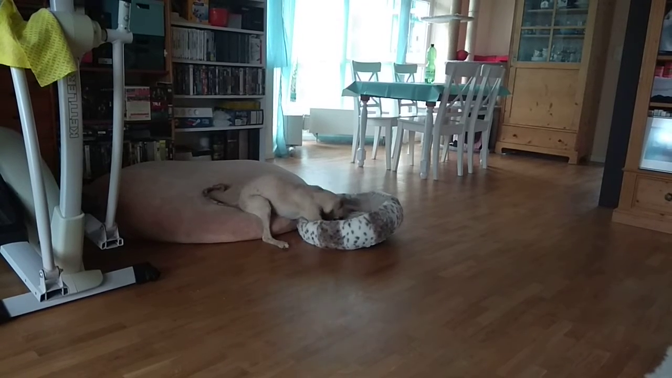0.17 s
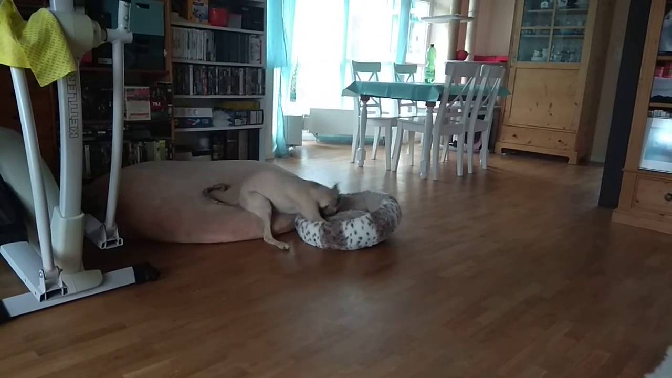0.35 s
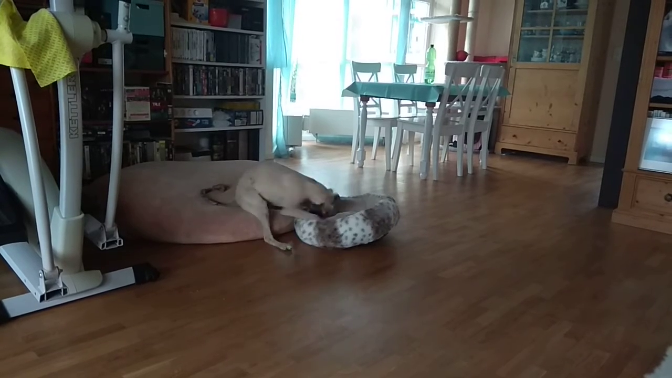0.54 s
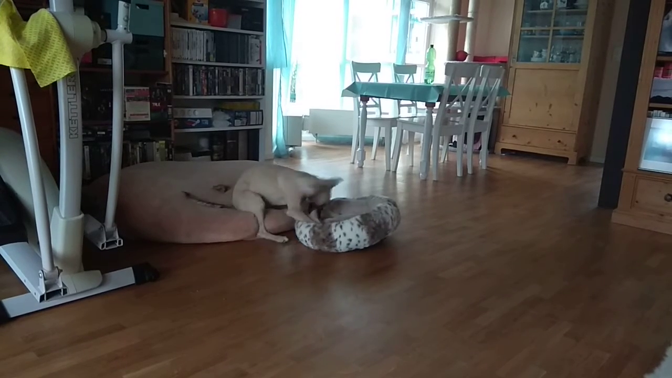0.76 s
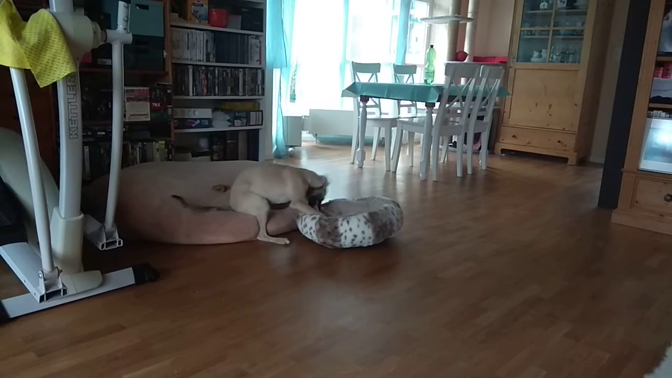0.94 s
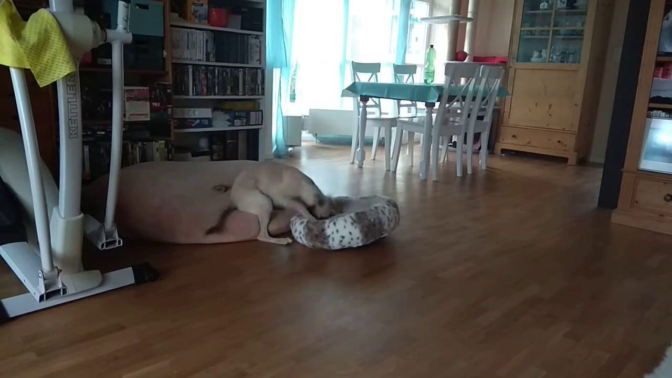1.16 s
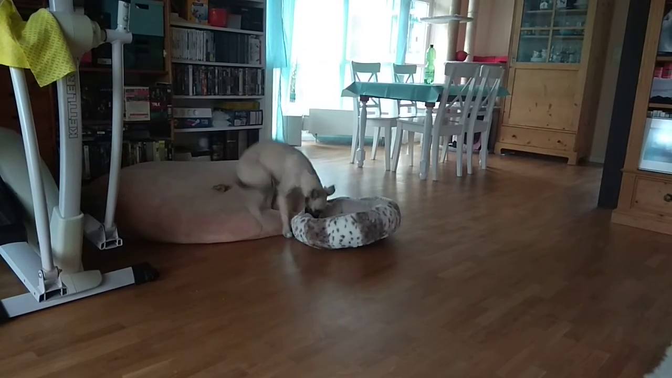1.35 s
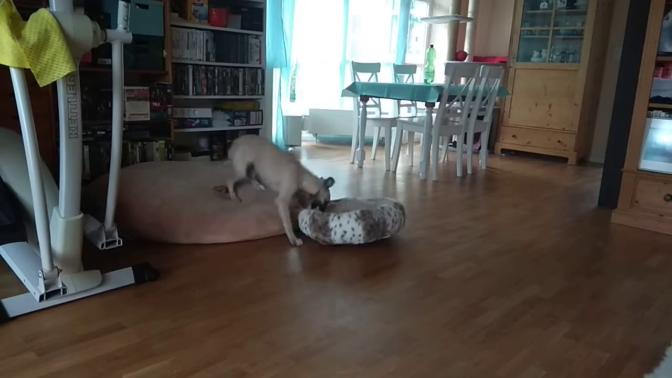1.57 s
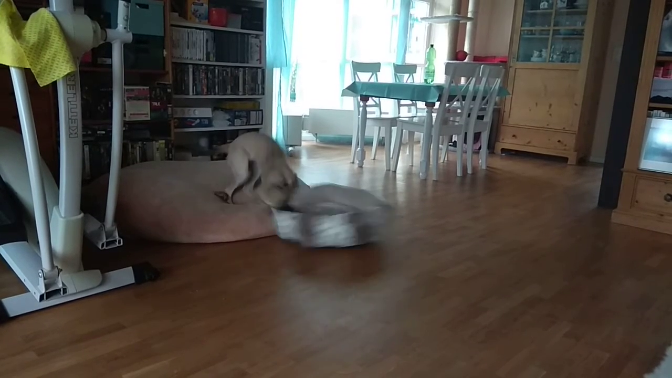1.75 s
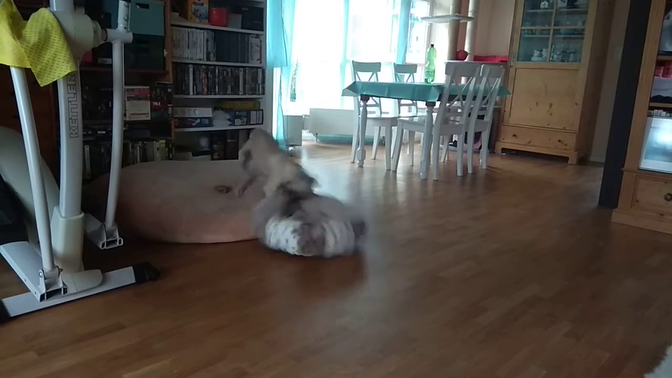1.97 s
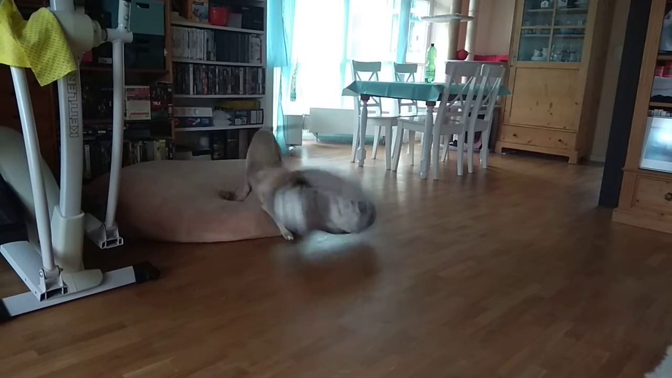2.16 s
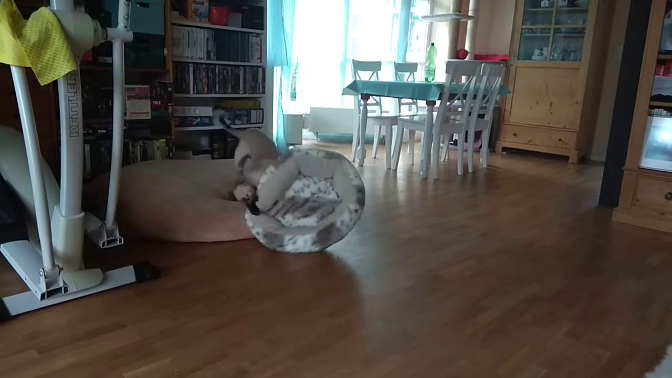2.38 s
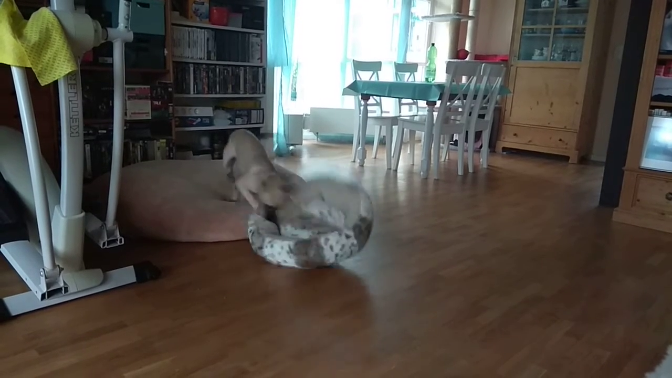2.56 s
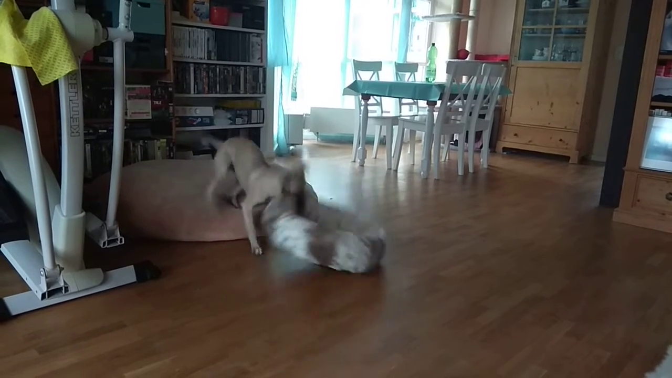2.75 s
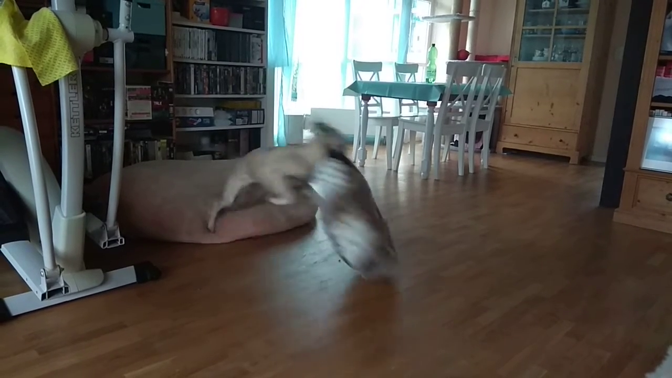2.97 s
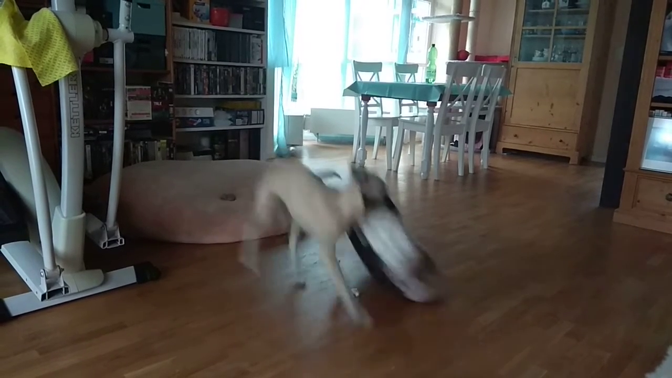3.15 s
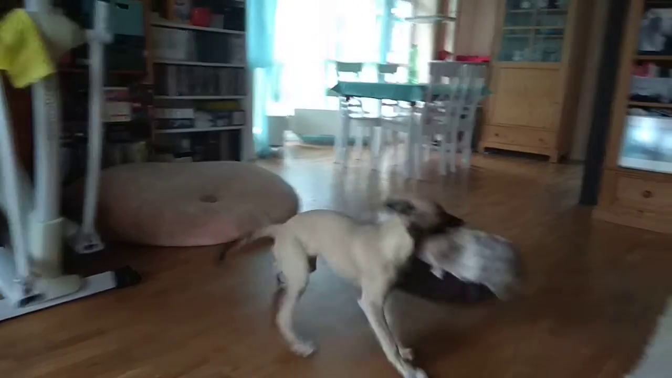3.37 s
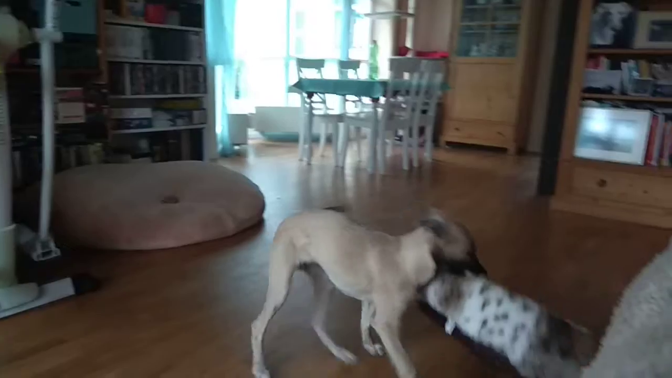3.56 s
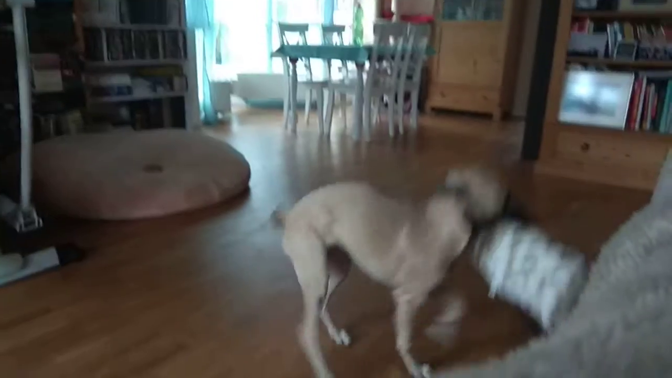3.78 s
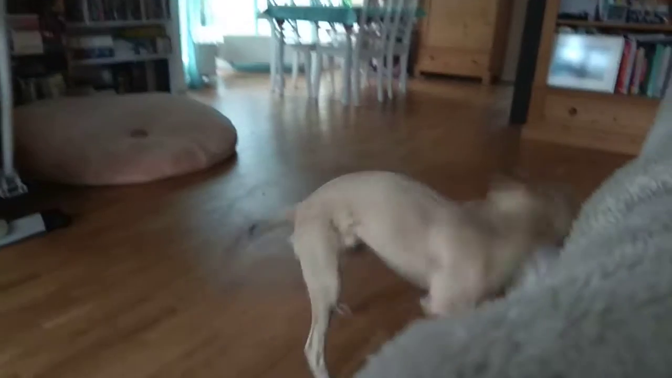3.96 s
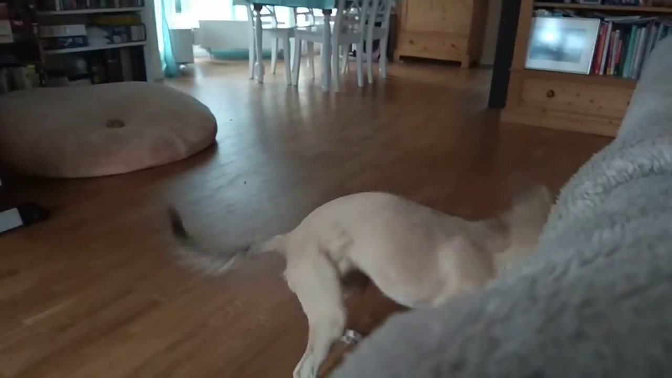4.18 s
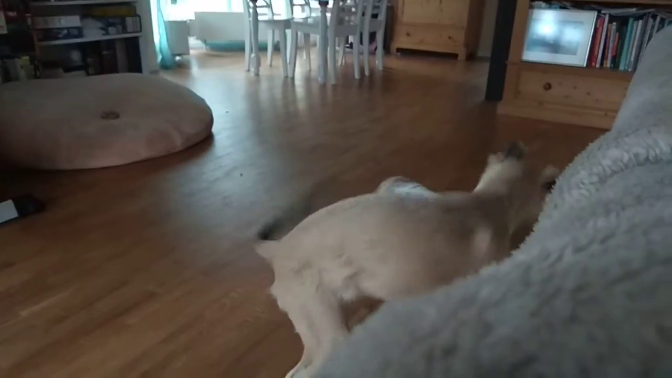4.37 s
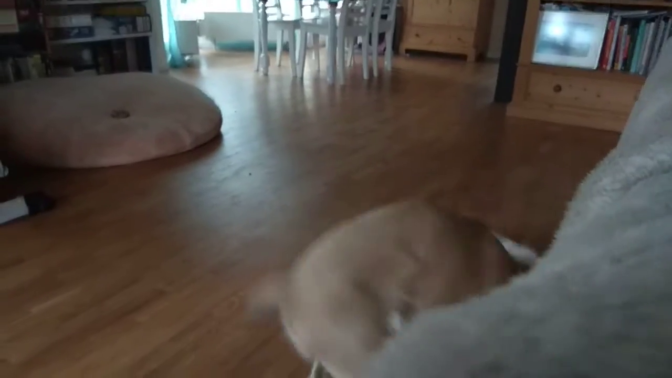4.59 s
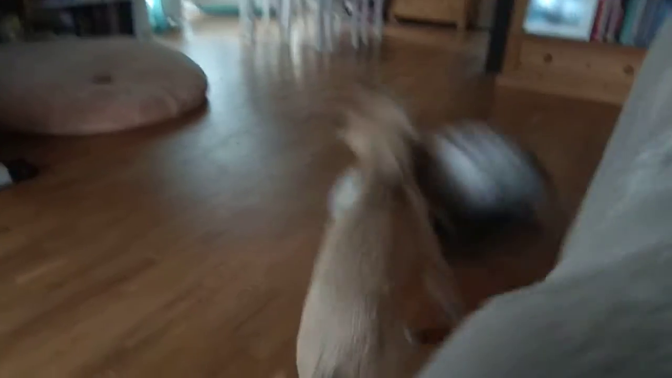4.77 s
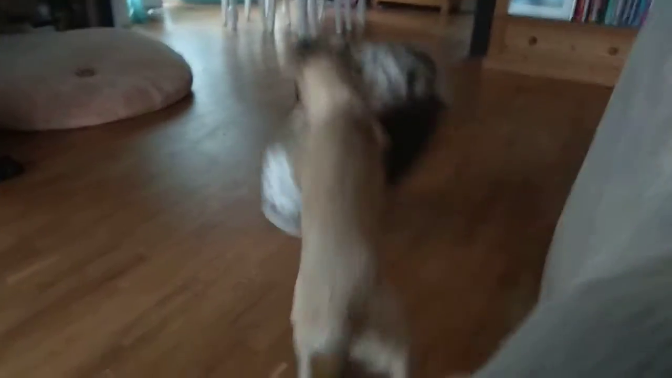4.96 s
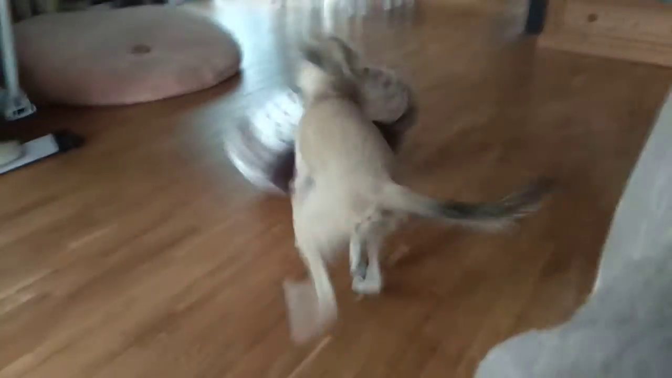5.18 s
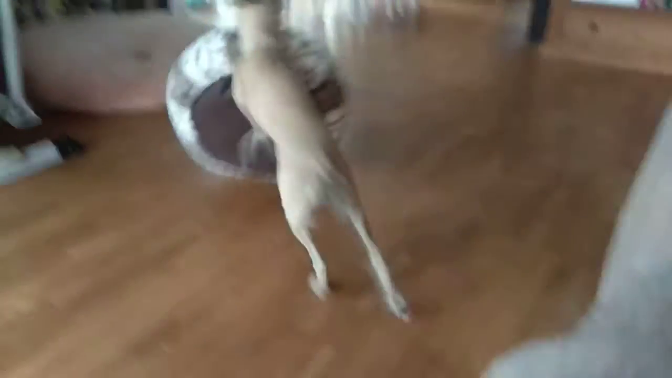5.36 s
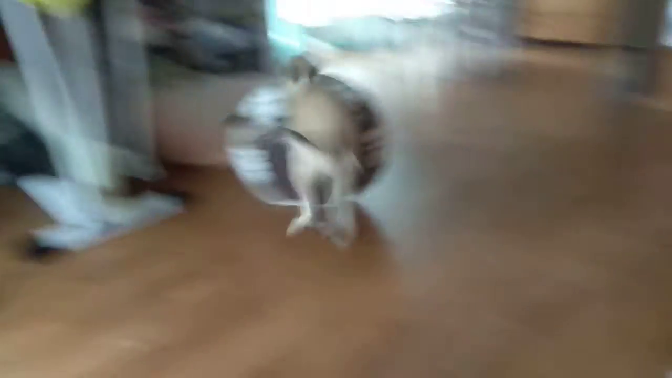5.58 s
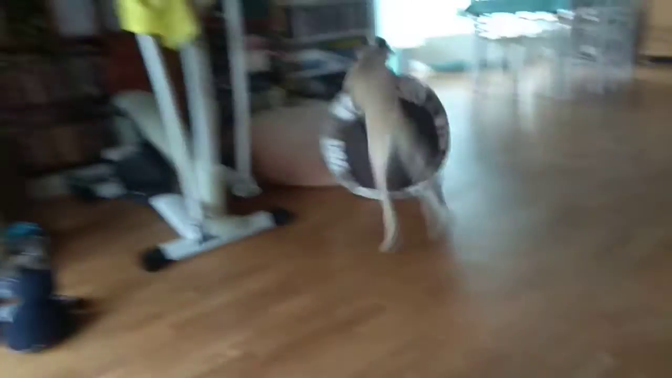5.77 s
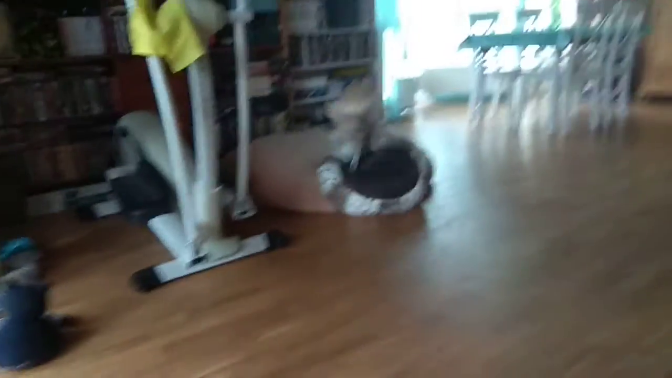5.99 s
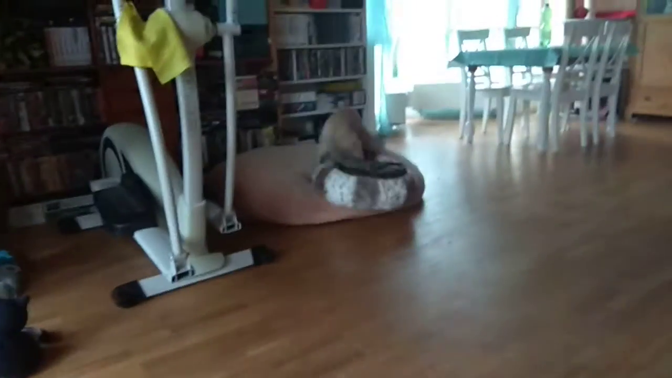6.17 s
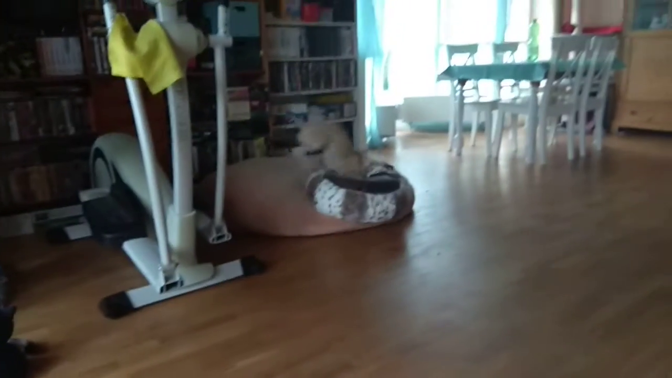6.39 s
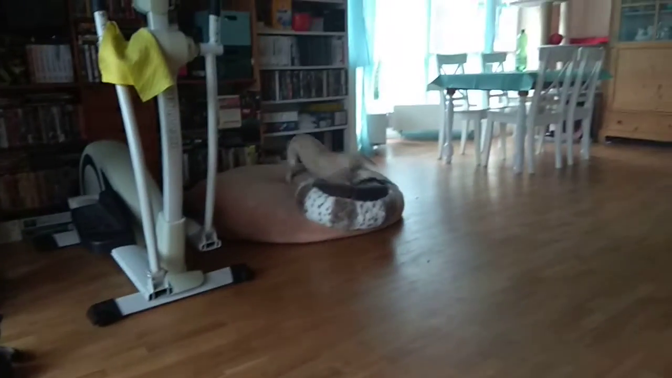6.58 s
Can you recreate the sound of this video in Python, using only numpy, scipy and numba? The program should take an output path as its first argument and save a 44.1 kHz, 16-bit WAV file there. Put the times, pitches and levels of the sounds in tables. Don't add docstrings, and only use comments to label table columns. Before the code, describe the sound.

Heard from a few metres on a handheld phone in stereo: faint fabric scuffs and a claw tick, then hard hissing drags of a soft bed over floorboards, flapping cloth and muffled, raspy playful growls from a small dog. Later come quick hollow paw thuds, squeaky skids and near rustling of the holder's sleeve at left, ending with a heavy soft landing and small rustles.

```python
import sys
import numpy as np
from scipy import signal
from scipy.fft import rfft, irfft, next_fast_len
from scipy.io import wavfile
from scipy.ndimage import uniform_filter1d
from numba import njit

SR = 44100
rng = np.random.default_rng(int(sys.argv[2]) if len(sys.argv) > 2 else 0)


def store_pcm(level_fs):
    pcm = np.round(np.clip(level_fs, -1, 1) * 32767).astype(np.int16)
    wavfile.write(sys.argv[1], SR, np.atleast_2d(pcm).T)


def gain_from_decibels(decibels):
    exponent = np.asarray(decibels, float) / 20
    return 10 ** exponent


N = 292559
T = np.arange(N) / SR
FAST = next_fast_len(N, True)
HZ = np.fft.rfftfreq(FAST, 1 / SR)

# frequency_hz, level_difference_db
PORT_DIFFERENCE = [(60, 5.5), (250, -.6), (600, 2), (1300, 7), (2300, -2), (4000, -8), (6500, -7),
                   (8000, -10), (9500, 0), (12000, 7), (15000, 8)]
# frequency_hz, likeness [0-1]
PORT_LIKENESS = [(60, 0.7), (450, 0.85), (800, 0.85), (1500, .15), (4000, 0.05)]
# frequency_hz, gain_db
FLOOR_DIP = [(330, 1), (400, -3), (460, -6.5), (530, -1.5), (620, 0)]

# frequency_hz, density_db [dB per Hz]
SLEEVE_SPECTRUM = [(150, -50), (800, -10.5), (3000, -13.5), (7000, -11), (10000, -3), (12000, -1.5),
                   (14000, -6), (16000, -15)]
# peak_s, level_db, rise_s [per 20 dB], fall_s [per 20 dB]
SLEEVE_RUBS = [(0.018, -58, .003, .03), (4.48, -55, .15, .06), (4.67, -37.5, .05, 2.5), (4.9, -35, 1.5, .3),
               (4.946, -30, .015, .25), (5.05, -33, .6, .4), (5.106, -27, .012, .09), (5.15, -34, .3, .08),
               (5.26, -36, .09, .11), (5.35, -42, .06, .07), (5.56, -36.5, .09, .9),
               (5.88, -38.5, 1.8, .27), (6.15, -36.5, .085, .1), (6.3, -49, .6, 1.8), (6.62, -45.5, .6, .6)]
# start_s, peak_db, pitch_hz
PHONE_KNOCKS = [
    (4.936, -22.5, 147),
    (5.1, -35, 187),
]

# start_s, length_s, pitch_hz, width_hz, level_db
SKIDS = [(1.08, .24, 2070, 250, -55), (1.415, 0.027, 4320, 700, -51), (1.424, 0.05, 13500, 1500, -54),
         (1.626, 0.074, 1140, 120, -49.5), (2.881, 0.085, 2050, 277.8, -44.5),
         (2.943, 0.091, 2000, 270, -45), (3.6, 0.15, 1852, 250, -43.5), (4.862, 0.15, 1850, 350, -37.5),
         (5.76, 0.033, 2350, 150, -48), (5.93, 0.065, 334, 60, -40), (5.94, .03, 1380, 100, -41.5),
         (5.945, .025, 2630, 250, -36), (6.105, .1, 1500, 1600, -40)]
# start_s, peak_db, pitch_hz
TICKS = [(1.416, -26, 4600), (1.4163, -21, 10500), (1.4198, -22, 4370), (1.4202, -22, 11800),
         (1.4238, -27, 3900), (1.4242, -21, 9500), (1.4258, -15, 13700), (2.3037, -19, 5900),
         (3.0899, -36, 6830), (3.2105, -22, 4500), (3.59, -20, 6110), (5.2175, -25, 3600),
         (5.4105, -23, 2500), (5.6236, -20, 1000), (5.6944, -17.5, 1150)]
# start_s, peak_db, pitch_hz, upper_pitch_hz, upper_level_db [relative]
THUDS = [(1.922, -32, 266, 600, -13), (2.301, -20.5, 255, 570, -5), (2.344, -32.5, 255, 560, -3),
         (2.513, -27, 300, 480, -5), (2.764, -31.5, 283, 560, -11), (3.09, -38, 257, 560, -5),
         (4.46, -41, 300, 500, 0), (4.492, -34, 308, 560, -9), (4.642, -38, 304, 560, -17),
         (4.707, -31.5, 205.5, 560, -8), (4.771, -36, 191, 560, -10), (5.21, -33, 269, 560, -5.5),
         (5.323, -39, 220, 560, -15), (5.408, -24.5, 300, 480, -6), (5.432, -33, 330, 520, -3),
         (5.441, -25.5, 247, 900, -14), (5.508, -33, 240, 500, -8), (5.516, -25, 250, 450, -3),
         (5.527, -29, 260, 590, 2), (5.558, -33.5, 266, 640, 1), (5.58, -33, 250, 560, -10),
         (5.622, -28, 200, 400, -8), (5.694, -40, 288, 800, -6), (5.737, -25, 255, 470, -6),
         (5.765, -36, 300, 640, -2), (5.8, -31, 285, 420, -8), (5.83, -38, 300, 500, -8),
         (5.933, -32, 320, 560, -20), (6.079, -33, 250, 500, -10), (6.105, -17, 290, 560, -3),
         (6.112, -17, 275, 570, 4), (6.126, -16, 310, 500, -3), (6.142, -24, 330, 560, 0),
         (6.166, -27.5, 250, 760, 6), (6.186, -27, 340, 540, -1), (6.208, -28, 342, 600, -2),
         (6.268, -28, 306, 520, -4), (6.358, -36.5, 254, 560, -5), (6.491, -41.5, 196, 560, -6),
         (6.551, -34.5, 185, 600, -6.5)]

# frequency_hz, density_db [dB per Hz]
BOARD_SPECTRUM = [(24, -64), (40, -17), (85, -26), (137, -7), (266, -3), (334, -4.5), (433, -7.5),
                  (560, -6), (747, -12), (869, -12.5), (1500, -19.5), (1950, -46), (3300, -120)]
# time_s, level_db
LOAD = [(0.0, -80), (0.2, -64), (0.9, -56.5), (1.65, -51), (2.52, -47), (2.7, -54), (3.05, -59),
        (3.156, -49.5), (3.84, -51), (4.44, -57), (4.53, -49), (4.98, -46), (5.33, -55), (5.56, -42),
        (5.68, -50), (6.06, -50), (6.16, -40), (6.45, -53)]
# frequency_hz, density_db [dB per Hz]
SWISH_SPECTRUM = [(880, -11), (1500, -20), (1980, -9.5), (2660, -8), (3690, -3.5), (6370, 0), (8740, -3),
                  (11500, 0.5), (12900, -6), (14800, -8), (16000, -30)]
# frequency_hz, density_db [dB per Hz]
SCUFF_SPECTRUM = [(500, -20), (800, -3.5), (1200, -1.5), (2000, 0), (3000, -4.5), (5000, -12), (12000, -60)]
# peak_s, swish_db, rise_s [per 20 dB], fall_s [per 20 dB], weight_db [scuff relative to swish]
DIGS = [(0.024, -80, .1, .1, -10), (0.222, -57.5, .14, .25, -2), (0.375, -62.5, .4, .12, -1),
        (0.56, -62.5, .25, .1, -8), (0.64, -51.5, .1, .6, -2), (0.81, -57, .6, .13, 1),
        (0.908, -56, .09, .55, 0), (1.07, -56, .1, .6, -1), (1.258, -52.5, .8, .22, 1),
        (1.417, -56, .004, .06, -17), (1.445, -56, .2, .25, -3)]
DRAGS = [
    (1.675, -41.5, .14, .22, -5),
    (1.84, -31.5, .08, .5, -12),
    (1.905, -29, .4, .25, -15),
    (2.033, -32.5, .3, .6, -10),
    (2.117, -34.5, .5, .165, -6),
]
FLIPS = [
    (2.305, -38.5, .008, .4, -10),
    (2.353, -37, .3, .16, -6),
    (2.62, -37.5, .12, .5, -10),
    (2.727, -31, .3, .25, -13),
    (2.787, -35.5, .3, .13, -4),
    (2.96, -55.5, .6, .2, 2),
]
SWINGS = [(3.09, -49.5, .008, .4, 1), (3.22, -37, .16, .2, -12), (3.268, -32.5, .15, .135, -13),
          (3.394, -41, .5, .3, -16), (3.56, -47, .6, .1, 1), (3.591, -31, .01, .3, -16),
          (3.618, -27.5, .06, .9, -19), (3.772, -28.5, .9, .135, -12), (3.99, -53, .3, .3, 3),
          (4.05, -39.5, .09, .1, -7), (4.146, -36.5, .08, .2, -6), (4.28, -38, .12, .4, -5),
          (4.362, -42, .4, .13, -3)]
SHAKES = [(4.474, -45.5, .11, .28, -3), (4.668, -40.5, .24, .3, -4), (4.944, -52, .4, .16, 10),
          (5.118, -48.5, .1, .14, -2), (5.221, -35, .008, .3, -14), (5.255, -37, .3, .14, -10),
          (5.411, -44, .005, .3, 0), (5.475, -40, .15, .15, -3), (5.567, -40, .2, .1, -2),
          (5.66, -52.5, .2, .9, 0), (5.853, -50, .9, .35, -6), (5.97, -43.5, .1, .13, 3),
          (6.135, -43.5, .11, .18, 3), (6.355, -52.5, .1, .22, -1), (6.6, -65, .6, .6, 7)]
# peak_s, level_db, rise_s [per 20 dB], fall_s [per 20 dB]
FRAYS = [
    (0.02, -72, .05, .08),
    (0.21, -58.5, .12, .1),
    (1.418, -47, .004, .14),
    (1.89, -30.5, .1, .15),
    (2.78, -38, .2, .1),
    (3.385, -39, .12, .25),
    (3.57, -43.5, .9, .1),
    (3.64, -29.5, .06, .25),
    (3.99, -48, .2, .1),
]

# time_s, effort_db, mouth_db [opening, relative]
GROWLS = [
    [(0.97, -57, -7), (1.006, -49, -11), (1.21, -34, -14), (1.282, -41, -11), (1.524, -43, -18),
     (1.57, -57, -9)],
    [(1.8, -53, 2), (1.852, -41, -7), (1.95, -39, 0), (1.996, -44, -5), (2.182, -42, -7), (2.26, -52, -2)],
    [(2.71, -46, -10), (2.728, -45, -6), (2.778, -38, -11), (2.83, -44, -9), (2.918, -45, -6),
     (3.01, -55, -5)],
    [(3.24, -50, 1), (3.27, -41, -9), (3.322, -48, -6), (3.358, -42, -11), (3.526, -40, -3), (3.6, -47, -4)],
    [(3.95, -53, -2), (3.976, -43, -7), (4.128, -36, -8), (4.202, -39, -12), (4.294, -46, -3),
     (4.37, -53, -2)],
    [(4.67, -55, 4), (4.706, -43, -5), (4.76, -47, -2), (4.788, -43, -8), (4.914, -46, 2), (4.925, -40, -2)],
]
# rate_hz [pulses], jitter [0-1], mouth_hz, force_db, brightness_db
VOICES = [
    (100, 0.3, 840, 1.2, -2),
    (96, .25, 640, 0, -1),
    (106.7, 0.3, 520, 0.5, -1),
    (92, .08, 750, 0.5, -1),
    (87.3, .18, 660, 2, 2),
    (90.9, .25, 700, -1.5, 2),
]


def unit(x):
    return x / np.sqrt(np.mean(x ** 2))


def on_log(table):
    hz, value = np.transpose(table)
    return np.interp(np.log(HZ + 1), np.log(hz), value)


def curve(table, column):
    rows = np.array(table)
    return np.interp(T, rows[:, 0], rows[:, column])


def shaped(x, gain):
    return irfft(rfft(x, FAST) * gain, FAST)[..., :N]


@njit
def resonator(x, hz, width):
    y, band, low = np.empty(len(x)), 0., 0.
    for i in range(len(x)):
        g, k = np.tan(np.pi * hz[i] / SR), width / hz[i]
        v = (band + g * (x[i] - low)) / (1 + g * (g + k))
        band, low, y[i] = 2 * v - band, low + 2 * g * v, k * v
    return y


def sine(hz, t):
    return np.sin(2 * np.pi * hz * t)


def add(out, start_s, wave):
    i = int(start_s * SR)
    wave = wave[:max(N - i, 0)]
    out[i:i + len(wave)] += wave


def walk(rate):
    hold = int(SR / rate)
    levels = np.repeat(rng.standard_normal(N // hold + 1), hold)
    return unit(uniform_filter1d(levels, hold)[:N])


def friction(spectrum, lo, hi, grain_db, patchy_db):
    grains = gain_from_decibels(grain_db * walk(900) + patchy_db * walk(25))
    mid, side = rfft(grains * rng.standard_normal((2, N)), FAST)
    alike = np.clip(on_log(PORT_LIKENESS), 0, 1)
    opposed = np.sqrt(1 - alike) * side * np.array([[1], [-1]])
    pair = gain_from_decibels(on_log(spectrum)) * (np.sqrt(1 + alike) * mid + opposed)
    in_band = pair.mean(axis=0) * (HZ > lo) * (HZ < hi)
    return irfft(pair, FAST)[:, :N] / np.std(irfft(in_band, FAST))


def swells(rows, extra_db, slow=1):
    handover_s = .015
    gain = np.zeros(N)
    peaks = [-1] + [row[0] for row in rows] + [T[-1] + 1]
    for row, db, before, after in zip(rows, extra_db, peaks, peaks[2:]):
        end = after + handover_s
        span = slice(max(int(before * SR), 0), int(end * SR))
        t = T[span] - row[0]
        alive = np.clip(np.minimum(T[span] - before, end - T[span]) / handover_s, 0, 1)
        drop_db = 20 / slow * np.maximum(-t / row[2], t / row[3])
        gain[span] = np.maximum(gain[span], alive * gain_from_decibels(row[1] + db - drop_db))
    return gain


def room(dry):
    t60_s, level_db = .3, -7
    t = T[:SR // 2]
    shared, own = rng.standard_normal(len(t)), rng.standard_normal((2, len(t)))
    bass = signal.butter(2, 650, fs=SR, output="sos")
    spray = signal.sosfilt(bass, shared - 1.16 * own) + own
    echoes = spray * gain_from_decibels(-60 * t / t60_s) * (t > .004)
    echoes *= gain_from_decibels(level_db) / np.sqrt(np.sum(echoes ** 2) / 2)
    wet = signal.fftconvolve(dry[None], echoes, axes=1)[:, :N]
    return (dry + wet) / np.sqrt(1 + gain_from_decibels(2 * level_db))


def holder():
    rub = friction(SLEEVE_SPECTRUM, 10350, 12640, grain_db=1.0, patchy_db=0.0)[0]
    out = swells(SLEEVE_RUBS, np.full(len(SLEEVE_RUBS), -4.5)) * rub
    t = T[:SR // 10]
    for start_s, db, hz in PHONE_KNOCKS:
        add(out, start_s, gain_from_decibels(db + 10.5) * sine(hz, t) * (t / 0.0067) * np.exp(1 - t / 0.0039))
    return out * gain_from_decibels(np.array([[0], [-22]]))


def boards():
    return gain_from_decibels(curve(LOAD, 1) - 0.38) * friction(BOARD_SPECTRUM, 215, 870, grain_db=0.36, patchy_db=1.95)


def claws():
    out = np.zeros(N)
    for start_s, length_s, hz, width_hz, db in SKIDS:
        n = int(length_s * SR)
        squeak = resonator(rng.standard_normal(n), np.full(n, 1. * hz), 1. * width_hz)
        add(out, start_s, gain_from_decibels(db) * unit(squeak) * signal.windows.tukey(n, .35))
    t = T[:SR // 40]
    for start_s, db, hz in TICKS:
        scrape = .5 * rng.standard_normal(len(t)) * np.exp(-t / 0.00065)
        add(out, start_s, gain_from_decibels(db - 11) * (scrape + sine(hz, t) * np.exp(-t / 0.0014)))
    return out


def thuds():
    paw_t60_s, bed_t60_s, bed_lands_s = .068, .05, 6.07
    out, t = np.zeros(N), T[:SR // 4]
    slap_band = signal.butter(2, [500, 1500], "band", fs=SR, output="sos")
    slaps = unit(signal.sosfilt(slap_band, rng.standard_normal((len(THUDS), len(t)))))
    detunings = rng.random((len(THUDS), 3))
    for (start_s, db, hz, upper_hz, upper_db), c, slap in zip(THUDS, detunings, slaps):
        t60_s = paw_t60_s if start_s < bed_lands_s else bed_t60_s
        fade = gain_from_decibels(-60 * t / t60_s) * (1 - np.exp(-(t / .0035) ** 2))
        low = sine(hz, t) + 0.74 * sine(hz * (1.4 + 0.26 * c[0]), t)
        low += .18 * sine(hz * (.5 + .1 * c[1]), t)
        upper = sine(upper_hz, t) + .5 * sine(upper_hz * (1.25 + .25 * c[2]), t) + .45 * slap
        add(out, start_s, gain_from_decibels(db + 1.5) * fade * (low + gain_from_decibels(upper_db) * upper))
    return out


def growls():
    throat_starts_hz, sag_hz_per_s = (242, 262, 265, 200, 230, 235), 70
    out = np.zeros(N)
    for rows, voice, start_hz in zip(GROWLS, VOICES, throat_starts_hz):
        rate_hz, jitter, mouth_hz, force_db, bright_db = voice
        a, b = int(rows[0][0] * SR), int(rows[-1][0] * SR)
        timing, strength = rng.standard_normal((2, 80))
        at = (np.cumsum(np.exp(jitter * timing)) / rate_hz * SR).astype(int)
        inside = at < b - a
        flaps = np.zeros(b - a)
        flaps[at[inside]] = -gain_from_decibels(9 * jitter * strength)[inside]
        breath = 0.053 * rng.standard_normal(b - a)
        effort_db, mouth_db = curve(rows, 1)[a:b], curve(rows, 2)[a:b]

        throat_hz = start_hz - sag_hz_per_s * T[:b - a]
        throat = resonator(flaps + breath, 0.56 * throat_hz, 157.0)
        throat = resonator(throat, throat_hz, 350.0)
        throat = resonator(throat, 1.13 * throat_hz, 234.0)
        steady_hz = np.full(b - a, 1. * mouth_hz)
        mouth = resonator(resonator(flaps + 1.33 * breath, steady_hz, 250.0), steady_hz, 360.0)
        voiced = unit(throat) + gain_from_decibels(mouth_db + bright_db) * unit(mouth)
        out[a:b] = gain_from_decibels(effort_db + force_db) * voiced * signal.windows.tukey(b - a, .08)
    return signal.sosfilt(signal.butter(2, 85, "high", fs=SR, output="sos"), out)


def cloth():
    moves = [DIGS, DRAGS, FLIPS, SWINGS, SHAKES]
    strokes = [stroke for move in moves for stroke in move]
    weight_db = np.array(strokes)[:, 4]
    move_db = np.repeat((-2, -3, -5, -2, -4.5), [len(move) for move in moves])
    fine_db = move_db - .1 * weight_db

    swish = friction(SWISH_SPECTRUM, 3500, 8000, grain_db=1.3, patchy_db=.3)
    fine = shaped(swish, 1 / (1 + (8600 / (HZ + 1)) ** 12))
    coarse_gain = swells(strokes, 0 * weight_db)
    fine_gain = np.hypot(swells(strokes, fine_db), swells(FRAYS, np.zeros(len(FRAYS))))
    scuff = friction(SCUFF_SPECTRUM, 700, 3090, grain_db=0.5, patchy_db=1.78)
    scuff_gain = swells(strokes, weight_db - 1.5, slow=1.5)
    return coarse_gain * (swish - fine) + fine_gain * fine + scuff_gain * scuff


def scene():
    left_lag_s = .00023
    dog = room(growls() + thuds() + claws())
    heard = shaped(dog, gain_from_decibels(on_log(FLOOR_DIP))) + cloth() + boards()
    tilt = gain_from_decibels(on_log(PORT_DIFFERENCE) * np.array([[.5], [-.5]]))
    lag = np.exp(-2j * np.pi * HZ * left_lag_s * np.array([[1], [0]]))
    return shaped(heard, tilt * lag) + holder()


def denoise(x, bite, from_hz, masked):
    hz, _, z = signal.stft(x, SR, nperseg=1024)
    power = abs(z) ** 2 + 1e-18
    both = abs(z.mean(axis=0)) ** 2 + 1e-18
    neighbours = uniform_filter1d(both, size=25, axis=0)
    top_band = uniform_filter1d(both * (hz > 9500)[:, None], size=300, axis=0)
    bar = np.maximum(neighbours, masked * (hz < 8500)[:, None] * top_band)
    treble = both[hz > from_hz].sum(axis=0)
    steady = np.clip(3 * np.roll(treble, 1) / np.roll(treble, -1), 0, 1)
    smooth = abs(uniform_filter1d(both, size=2, axis=1)) + 1e-16
    weak = steady * uniform_filter1d(bar, size=2, axis=1) / smooth
    depth = bite * np.clip(hz / from_hz - 1, 0, 1)[:, None]
    kept = power * np.clip(1 - depth * weak, .003, 1)
    near = abs(uniform_filter1d(power, size=25, axis=1)) + 1e-16
    left = abs(uniform_filter1d(kept, size=25, axis=1)) + 1e-16
    return signal.istft(z * np.sqrt(kept * near / left / power), SR, nperseg=1024)[1][:, :N]


def band_limit(x):
    return signal.sosfilt(signal.butter(12, 16000, fs=SR, output="sos"), x)


def record(dry):
    bass_cut = signal.sosfilt(signal.butter(2, 110, "high", fs=SR, output="sos"), dry)
    top_cut = signal.sosfilt(signal.ellip(10, .5, 70, 15750, fs=SR, output="sos"), bass_cut)
    mix = denoise(top_cut, bite=.45, from_hz=1500, masked=2.2)
    return band_limit(mix)


dry = scene()
out = record(dry)
store_pcm(out)
```